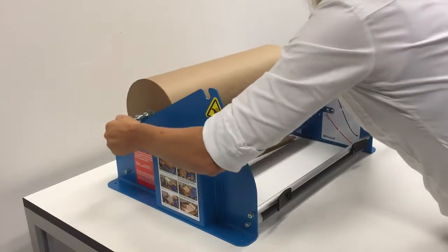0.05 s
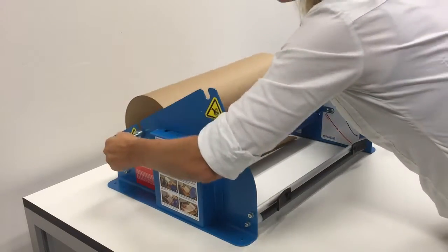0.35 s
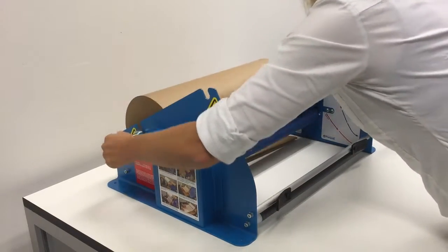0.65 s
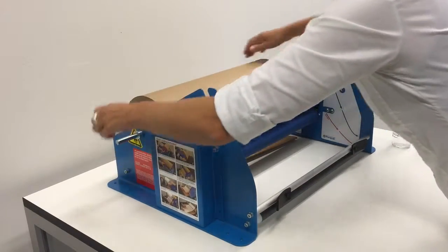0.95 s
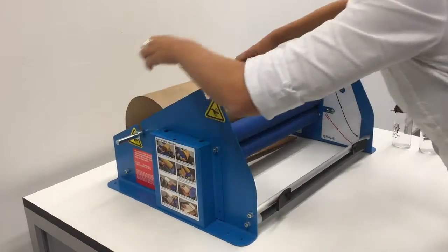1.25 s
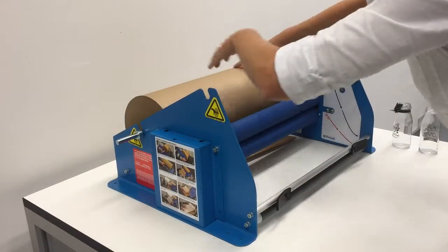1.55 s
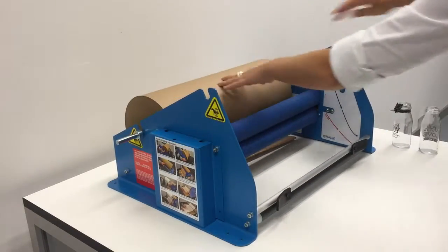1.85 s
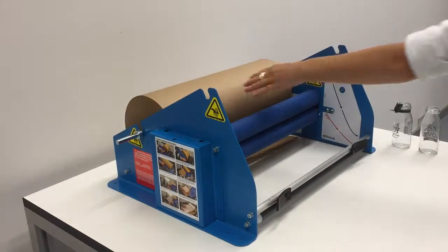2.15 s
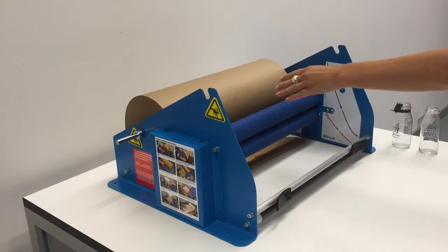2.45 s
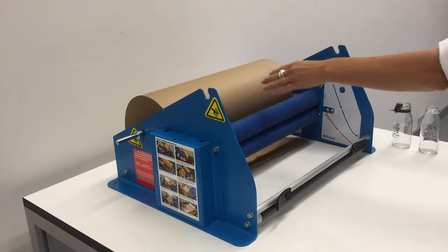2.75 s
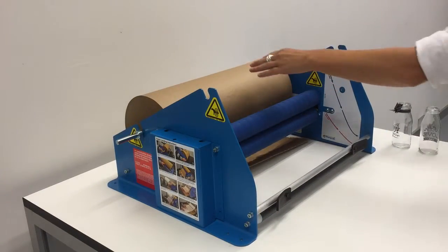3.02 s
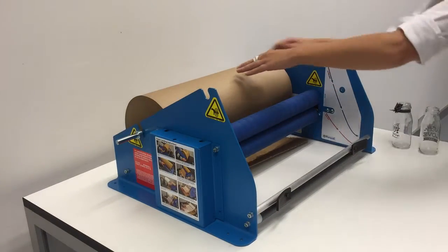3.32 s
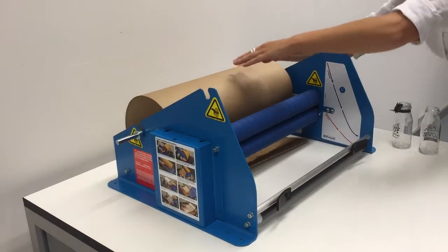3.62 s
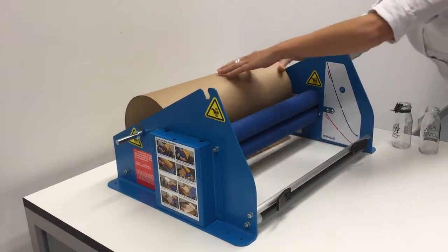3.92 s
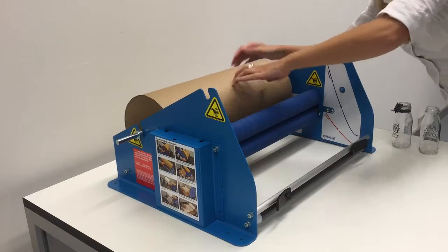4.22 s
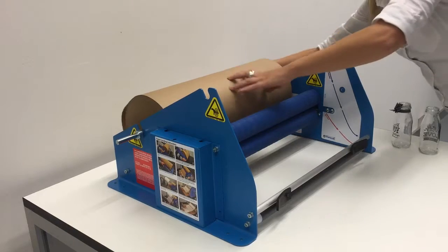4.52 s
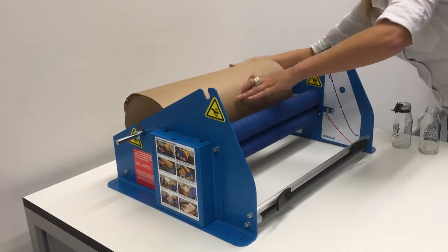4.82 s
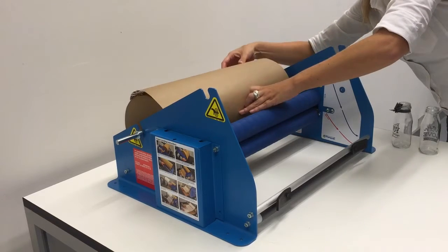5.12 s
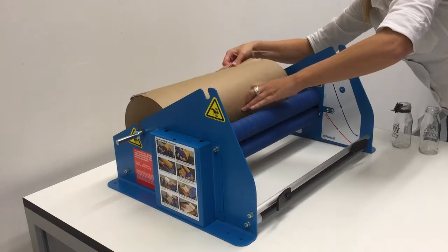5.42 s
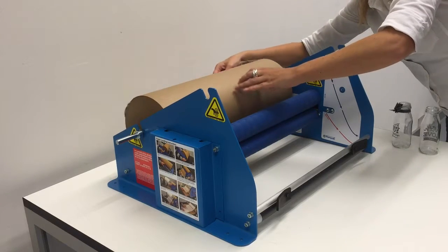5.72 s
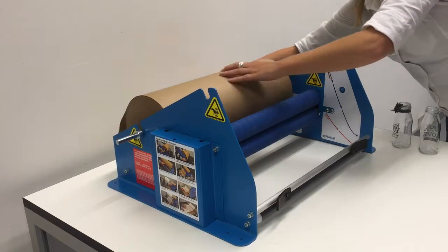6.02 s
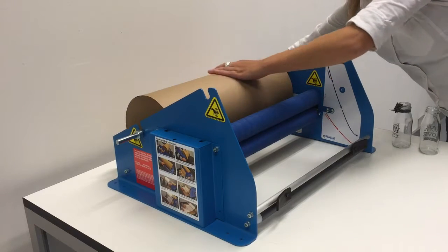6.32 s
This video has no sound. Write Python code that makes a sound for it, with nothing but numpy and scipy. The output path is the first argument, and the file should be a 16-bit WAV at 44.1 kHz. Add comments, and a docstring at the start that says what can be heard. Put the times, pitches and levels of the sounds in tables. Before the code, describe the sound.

A steel paper dispenser is handled in a small, bare room, with soft ventilation air and a low hum throughout. At the start a handle scrapes in its bearing. At about 0.3 seconds a catch snaps sharply and the mechanism clatters until 0.6, ringing the frame and thumping the table; this is the loudest moment.

From 1.1 to 2.4 seconds hands rub a heavy, hollow paper roll in short, much softer strokes, with a few dry crackles and a light knock near 1.8. The roll gives a brief low shudder around 2.2 and knocks distinctly in its cradle at 2.5.

After a lull, faint sliding resumes at 3.3 seconds, with a brighter hissing swipe around 4.2. From about 5.1 to 6 seconds the outer sheet crackles in small snaps under gentle rubbing. A light clicking knock comes near 6.4.

```python
"""A small quiet room, a steel paper dispenser on a table. A handle scrapes round in its bearing, the
catch snaps and the mechanism clatters home, ringing the frame and thumping the table. Then hands stroke
and turn the heavy hollow paper roll: it rubs and hisses, shudders under a palm, knocks in its cradle,
and its outer sheet crackles. Ventilation hums throughout."""
import sys
import numpy as np
from scipy import signal
from scipy.fft import rfft, irfft, next_fast_len
from scipy.io import wavfile
from scipy.ndimage import uniform_filter1d, map_coordinates

SR = 44100
rng = np.random.default_rng(int(sys.argv[2]) if len(sys.argv) > 2 else 0)


def master_out(mix):
    """Clip the mix to full scale and print it as 16-bit PCM to the path in sys.argv[1]."""
    frames = np.transpose(np.atleast_2d(mix))
    ceiling = np.clip(frames, -1, 1)
    pcm = np.round(ceiling * 32767).astype(np.int16)
    wavfile.write(sys.argv[1], SR, pcm)


N = 280476

# paper, low rub spectrum: (frequency [Hz], level [dB])
PAPER_RUB = [(250, -40), (500, 4), (1000, 0.5), (2000, -2.5), (3300, 0), (5500, -21.5), (10000, -41.5)]
# paper, fibre hiss spectrum: (frequency [Hz], level [dB])
PAPER_HISS = [(1500, -18), (3500, -5), (6000, -1), (9300, 2.5), (12000, -2.5), (15500, -10)]


def mechanism():
    """Each contact snaps the catch, rings the steel frame and thumps the table."""
    # contacts: (time [s], catch [dB], frame [dB], thump [dB])
    contacts = [(.3401, -15.5, -31.5, -34.5), (.401, -44.5, -31, -30.5), (0.42, -28.5, -37.5, -37.5),
                (0.4446, -32, -38.5, -33), (.45, -27, -33, -41), (.466, -45.5, -32.5, -36),
                (0.4815, -42, -27.5, -22.5), (.5007, -37.5, -29, -29.5), (0.5243, -33.5, -36.5, -36),
                (.544, -23.5, -26, -34), (0.5564, -42, -23, -30.5), (0.5703, -41, -30.5, -30.5)]
    # catch modes: (frequency [Hz], level [dB], t60 [s])
    catch_modes = [(353, -17, 0.2), (540, -7, 0.2), (643, -18, 0.2), (870, -18, 0.17), (1541, -5, 0.1),
                   (2005, -15, 0.11), (2632, -11, 0.15), (2668, 0, 0.09), (2840, -8, 0.12), (3075, -4, 0.1),
                   (3410, -10, 0.2), (3448, -4, 0.11), (3560, -3, 0.08), (3740, -6, 0.085),
                   (4240, -12, 0.14), (4330, -12, 0.09), (4675, -12, 0.09), (4807, -7, 0.08),
                   (5715, -15, 0.09), (6140, -26, 0.13)]
    # catch contact noise: (frequency [Hz], level [dB])
    snap_spectrum = [(120, -48), (200, -13.5), (547, -5), (1270, -15.5), (1550, 1.5), (1830, -32.5),
                     (1970, -18), (3460, -4.5), (3940, -12), (4310, -4), (5280, -20), (6330, -19),
                     (15800, -46.5)]
    # side plate and roller modes: (frequency [Hz], level [dB], t60 [s])
    frame_modes = [(302, -14, 0.44), (345, -9, 0.35), (399, -12, 0.37), (446, 0, 0.36), (540, 1, 0.27),
                   (613, -10, 0.3), (658, -20, 0.44), (797, -13, 0.28), (985, -15, 0.28), (1040, -12, 0.42),
                   (1375, -17, 0.21), (1412, -11, 0.36), (1475, -13, 0.45), (1537, -10, 0.34),
                   (2035, -23, 0.34), (2336, -23, 0.3), (2660, -18, 0.32), (2700, -18, 0.45),
                   (3403, -15, 0.22), (3483, -26, 0.38), (3722, -25, 0.27), (4270, -21, 0.4),
                   (4355, -19, 0.39), (4432, -17, 0.26), (5305, -23, 0.32), (6462, -31, 0.31),
                   (7555, -29, 0.15), (7980, -47, 0.42)]
    # dense plate ring: (frequency [Hz], level [dB])
    plate_spectrum = [(88, -34.5), (150, -5.5), (545, -2.5), (844, -13.5), (964, -7), (1280, -16),
                      (1440, -7), (2220, -21), (2630, -18.5), (4400, -26.5), (4930, -32), (6430, -34.5),
                      (14000, -68.5)]
    # its decay: (frequency [Hz], t60 [s])
    plate_decay = [(200, 0.22), (1500, 0.17), (5000, 0.064), (12000, 0.13)]
    # table top modes: (frequency [Hz], level [dB], t60 [s])
    table_modes = [(72, 0, .18), (90, -3, .2), (118, 0, .3), (155, -7, .18), (212, -5, .17), (242, -6, .12),
                   (298, -10, .15), (398, -10, .2)]
    out = np.zeros(N)
    onset = 1 - np.exp(-np.arange(SR) / SR / .00091)  # plates take a moment to move
    for start_s, catch_db, frame_db, thump_db in contacts + settling(contacts[-1]):
        snap = chatter(burst(snap_spectrum, t60_s=.05))
        catch = amp(-4) * ring(catch_modes) + amp(-.5) * snap
        plates = unit_attack(fade(colour(rng.standard_normal(SR), plate_spectrum), plate_decay))
        frame = amp(-5) * ring(frame_modes) + amp(-2) * plates
        hit = amp(catch_db) * catch + amp(frame_db) * frame + amp(thump_db) * ring(table_modes)
        add(out, start_s, onset * hit)
    return out


def settling(contact, first_gap_s=.039, gap_ratio=.6, catch_loss_db=18, loss_db=5):
    """The works rock to rest: three rebounds, ever sooner and softer."""
    start_s, catch_db, frame_db, thump_db = contact
    times_s = start_s + np.cumsum(first_gap_s * gap_ratio ** np.arange(3))
    return [(time_s, catch_db - catch_loss_db * k, frame_db - loss_db * k, thump_db - loss_db * k)
            for k, time_s in enumerate(times_s, 1)]


def handle():
    """The shaft scrapes in its bearing at each pull before the catch lets go."""
    # handle pulls: (start [s], length [s], level [dB])
    pulls = [(-.05, 0.21, -48.5), (.09, 0.28, -58.5), (0.231, 0.082, -48.5), (0.317, .04, -56)]
    # bearing scrape: (frequency [Hz], level [dB])
    shaft_spectrum = [(290, -32), (500, 1.5), (707, -3.5), (771, -10.5), (944, -3.5), (1390, -7),
                      (1570, 1.5), (1810, -9), (2250, 1), (2520, -8), (3040, -8), (5050, -16), (11500, -16),
                      (15800, -28)]
    effort = sum(amp(db) * swell(start_s, length_s) for start_s, length_s, db in pulls)
    return amp(2.5) * effort * friction(shaft_spectrum, grain_db=3.5, clump_db=1.5)


def roll():
    """The heavy roll shudders as a dragging palm grips it, and knocks in its cradle."""
    # roll shudder: (frequency [Hz], level [dB])
    shudder_spectrum = [(45, -24), (58, -12), (76, 0), (100, -2), (128, 4), (170, -16), (300, -15),
                        (700, -45.5)]
    # cradle knocks: (time [s], thud [dB], click [dB])
    knocks = [(1.845, -47, -65), (2.5213, -33.5, -39.5), (2.549, -57, -49), (2.588, -52, -58),
              (4.312, -57, -80), (6.3515, -51, -40)]
    # cradle modes: (frequency [Hz], level [dB], t60 [s])
    cradle_modes = [(216.4, -3.5, 0.11), (330, -1.5, 0.03), (570.4, 0, 0.039), (683, -2, 0.06),
                    (956, -5.5, 0.03), (1273, -15, 0.05), (1588, -13, 0.052), (2460, -10, 0.026)]
    # knock contact noise: (frequency [Hz], level [dB])
    click_spectrum = [(200, 7.5), (600, -4.5), (1100, 3), (2400, -4), (4300, -10.5), (9000, -21.5),
                      (15500, -26.5)]
    palm = amp(-39.5) * swell(start_s=2.13, length_s=.2, peak_share=.18)
    out = palm * friction(shudder_spectrum, grain_db=3.5, clump_db=3)
    for start_s, thud_db, click_db in knocks:
        thud = amp(thud_db) * ring(cradle_modes)
        click = amp(click_db) * burst(click_spectrum, t60_s=.069)
        add(out, start_s, thud + click)
    return out


def hands():
    """Skin on paper: pressure rubs the hollow roll into resonance, light quick sliding hisses."""
    # hand strokes: (start [s], length [s], rub [dB], hiss [dB])
    strokes = [(1.114, .02, -50, -76), (1.128, 0.054, -66.5, -62.5), (1.438, 0.042, -58.5, -71),
               (1.519, 0.23, -52, -57.5), (1.69, 0.14, -61.5, -77), (1.787, 0.094, -54.5, -60.5),
               (2.066, .2, -49, -61), (2.2, 0.17, -59.5, -59.5), (3.275, .08, -78, -73),
               (3.412, 0.42, -71.5, -73), (3.526, .1, -66, -61.5), (3.877, 0.24, -69, -69),
               (4.053, .1, -70, -67), (4.174, .175, -55.5, -50), (4.335, 0.0635, -60, -68),
               (4.467, 0.047, -74, -61), (4.55, 0.043, -71, -65.5), (4.85, 1.7, -80, -78),
               (5.212, 0.078, -73, -62), (5.27, 0.39, -73.5, -74), (5.367, 0.082, -63.5, -63.5),
               (6.002, 0.06, -72, -64.5)]
    # roll resonances: (frequency [Hz], width [Hz], level [dB])
    tube_peaks = [(689, 30, -0.5), (1688, 92, 3.5), (1940, 99, -8), (2230, 140, 5), (3087, 61, -15),
                  (3480, 210, -0.5), (4680, 33, -55)]
    # fast-stroke fizz: (frequency [Hz], level [dB])
    fizz_spectrum = [(5000, -22), (9000, -2.5), (13000, 0), (15800, -4)]
    # narrow whisper of sliding paper: (frequency [Hz], level [dB])
    whisper_spectrum = [(1500, -24), (2200, -7), (2650, 5.5), (3050, -1), (3800, -12), (9000, -19.5),
                        (15000, -25)]
    press = sum(amp(db) * swell(start_s, length_s) for start_s, length_s, db, _ in strokes)
    glide = sum(amp(db) * swell(start_s, length_s) for start_s, length_s, _, db in strokes)
    slips = friction(PAPER_RUB, grain_db=4.5, clump_db=2.5)
    drag = patchy(resonate(slips, tube_peaks) + slips, depth_db=2.2)  # the moving hand damps the roll
    fibres = friction(PAPER_HISS, grain_db=4, clump_db=3)
    speed = np.sqrt(glide / glide.max())  # faster strokes are brighter
    fizz = speed * friction(fizz_spectrum, grain_db=2.5, clump_db=1)
    hiss = amp(-1.5) * fibres + amp(-.5) * fizz
    slide = amp(-57) * swell(start_s=5.1, length_s=.13)
    whisper = friction(whisper_spectrum, grain_db=.5, clump_db=1.5)
    return press * drag + glide * hiss + slide * whisper


def paper():
    """The outer sheet buckles in short dry snaps, each a little run of creases."""
    # snaps under the fingers: (time [s], level [dB], low crackle balance [dB])
    snaps = [(1.553, -41.5, -20), (1.7307, -48, -3), (1.8107, -46, -13), (4.163, -48, -5),
             (4.3758, -45, -17), (5.2256, -44.5, -30.5), (5.3025, -45, -27), (5.3288, -49.5, -15),
             (5.4468, -42.5, -11), (5.4734, -48.5, -18), (5.5413, -38, -7), (5.708, -44, -23.5),
             (5.9231, -45.5, -20), (5.9631, -49, -26)]
    out = np.zeros(N)
    for start_s, db, low_db in snaps:
        crease = burst(PAPER_HISS, t60_s=.02) + amp(low_db + 2) * burst(PAPER_RUB, t60_s=.052)
        add(out, start_s, amp(db - 15.5) * chatter(crease))
    return out


def room(x):
    """Bare walls answer after 5 ms."""
    # reverberation: (frequency [Hz], t60 [s])
    wall_decay = [(100, 0.41), (500, 0.63), (3000, 0.48), (7000, .4), (14000, 0.24)]
    tail = np.pad(fade(rng.standard_normal(SR), wall_decay), (SR // 200, 0))
    return signal.fftconvolve(x, tail / np.linalg.norm(tail))[:N]


def ventilation():
    """A soft rush of air with a slightly unsteady motor hum."""
    # motor harmonics: (frequency [Hz], level [dB])
    harmonics = [(102.3, -62.5), (204.6, -58), (306.8, -69)]
    # air rush: (frequency [Hz], level [dB])
    air_spectrum = [(25, -22.5), (60, -14), (95, -9.5), (130, -12), (155, -6.5), (205, -5), (240, -14.5),
                    (305, -12), (440, -25), (555, -19.5), (640, -28.5), (720, -24), (830, -29.5),
                    (1200, -36), (4000, -45), (15800, -55)]
    t = np.arange(N) / SR
    hum = sum(amp(db + 1.5 * wobble(4)) * np.sqrt(2) * np.sin(2 * np.pi * hz * t + .4 * wobble(5))
              for hz, db in harmonics)
    air = patchy(colour(rng.standard_normal(N), air_spectrum), depth_db=1.5)
    return amp(-52.5) * air + amp(1.5) * hum


def ring(modes):
    """Damped modes, struck at slightly new strengths each time."""
    hz, db, t60_s = np.transpose(modes)[:, :, None]
    t = np.arange(SR) / SR
    strength = amp(db + 1.5 * rng.standard_normal(hz.shape))
    strength[1::2] *= -1  # neighbouring modes swing opposite ways
    return unit_attack(np.sum(strength * amp(-60 * t / t60_s) * np.sin(2 * np.pi * hz * t), axis=0))


def burst(spectrum, t60_s, rise_s=.00072):
    """Decaying coloured contact noise."""
    t = np.arange(SR) / SR
    noise = colour(rng.standard_normal(SR), spectrum)
    return unit_attack(noise * amp(-60 * t / t60_s) * (1 - np.exp(-t / rise_s)))


def chatter(x, gap_s=.0028, first_db=-10, loss_db=2.5):
    """Three weaker rebounds within milliseconds."""
    lags = np.round(SR * gap_s * np.cumsum(rng.uniform(.6, 1.4, size=3))).astype(int)
    rebounds = sum(amp(first_db - loss_db * k) * np.pad(x, (lag, 0))[:len(x)]
                   for k, lag in enumerate(lags))
    return unit_attack(x + rebounds)


def friction(spectrum, grain_db, clump_db):
    """Tiny slips of uneven size, bunched in clumps."""
    slips = rng.standard_normal(N) * amp(grain_db * wobble(1500) + clump_db * wobble(70))
    return colour(slips, spectrum)


def swell(start_s, length_s, peak_share=.42, taper=1.5):
    """Gain of one movement: speeds up until peak_share of its length, then slows to rest."""
    progress = (np.arange(N) / SR - start_s) / length_s
    skew = np.log(.5) / np.log(peak_share)
    moving = (progress > 0) & (progress < 1)
    out = np.zeros(N)
    out[moving] = np.sin(np.pi * progress[moving] ** skew) ** taper
    return out


def resonate(x, peaks):
    """Parallel resonances of alternating sign, at rms 1."""
    size = next_fast_len(N + SR // 4)
    f = np.fft.rfftfreq(size, 1 / SR)
    body = sum((-1) ** k * amp(db) * 1j * f * width_hz / (hz * hz - f * f + 1j * f * width_hz)
               for k, (hz, width_hz, db) in enumerate(peaks))
    return unit(irfft(rfft(x, size) * body, size)[:N])


def patchy(x, depth_db):
    """Narrow bands swell and fade at random, at rms 1."""
    bands = signal.stft(x, nperseg=1024)[2]
    drift = uniform_filter1d(rng.standard_normal(bands.shape), size=5, axis=0)
    drift = uniform_filter1d(drift, size=4, axis=1)
    return unit(signal.istft(bands * amp(depth_db * unit(drift)), nperseg=1024)[1][:N])


def fade(x, decays):
    """Each frequency dies at its own rate."""
    hz, t, bands = signal.stft(x, SR, nperseg=256)
    t60_s = along(decays, hz)[:, None]
    return signal.istft(bands * amp(-60 * t / t60_s), SR, nperseg=256)[1][:len(x)]


def colour(x, spectrum):
    """Filter by a spectrum, at rms 1."""
    size = next_fast_len(len(x) + SR // 8)
    gain = amp(along(spectrum, np.fft.rfftfreq(size, 1 / SR)))
    return unit(irfft(rfft(x, size) * gain, size)[:len(x)])


def wobble(rate_hz):
    """Smooth curve through random knots."""
    knots = rng.standard_normal(int(N * rate_hz / SR) + 4)
    return map_coordinates(knots, [np.arange(N) * rate_hz / SR])


def along(points, hz):
    """Interpolate on a log frequency axis."""
    knots_hz, values = np.transpose(points)
    return np.interp(np.log(hz + 1), np.log(knots_hz + 1), values)


def amp(db):
    """Decibels to gain."""
    return 10 ** (np.asarray(db) / 20)


def unit(x):
    """Scale to rms 1."""
    return x / np.sqrt(np.mean(x ** 2) + 1e-20)


def unit_attack(x):
    """Scale to rms 1 over the first 15 ms."""
    return x / np.sqrt(np.mean(x[:round(.015 * SR)] ** 2))


def add(track, start_s, sound):
    """Mix in place."""
    i = round(start_s * SR)
    track[i:i + len(sound)] += sound[:N - i]


def scene():
    """Machine and hands in the room, over the ventilation."""
    machine = mechanism() + handle()
    handling = roll() + hands() + paper()
    reverb = amp(-11.5) * room(machine) + amp(-10) * room(handling)
    return (machine + handling + reverb + ventilation())[None]


def record(dry, low_hz=42, top_hz=15850):
    """Bass roll-off and a hard upper band limit."""
    size = next_fast_len(N + SR // 2)
    thinned = signal.sosfilt(signal.butter(3, low_hz, "highpass", fs=SR, output="sos"), dry)
    passband = np.fft.rfftfreq(size, 1 / SR) < top_hz
    return irfft(rfft(thinned, size) * passband, size)[..., :N]


dry = scene()
out = record(dry)
master_out(out)
```